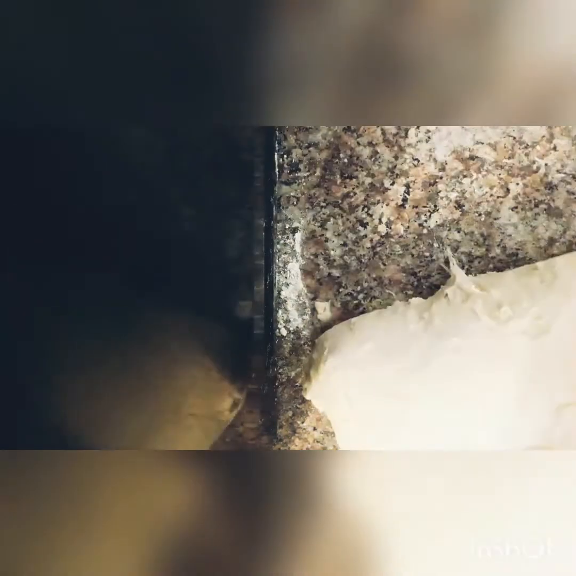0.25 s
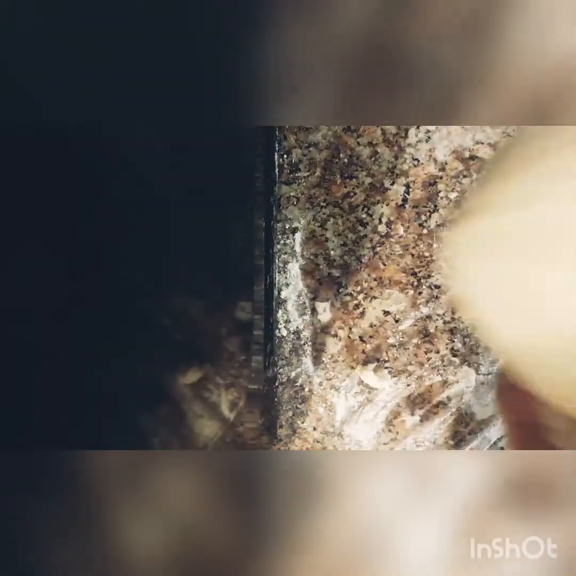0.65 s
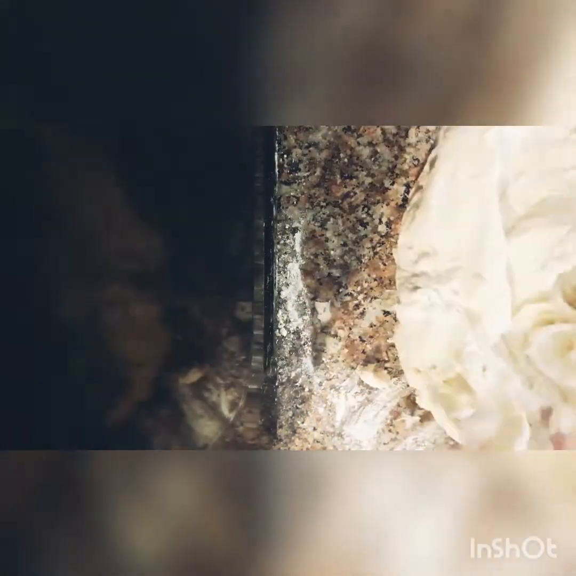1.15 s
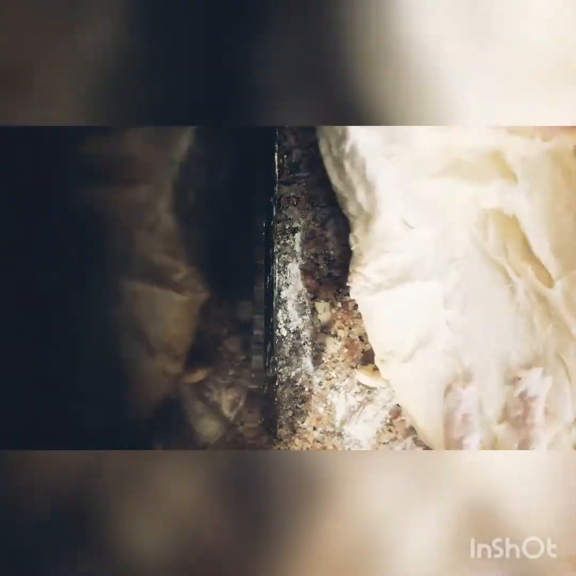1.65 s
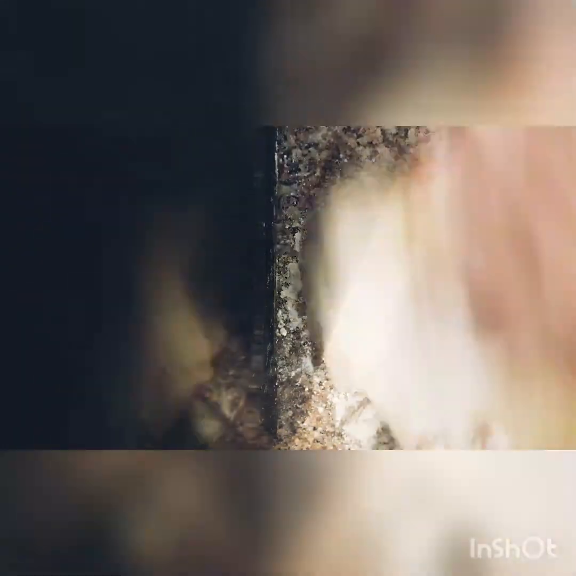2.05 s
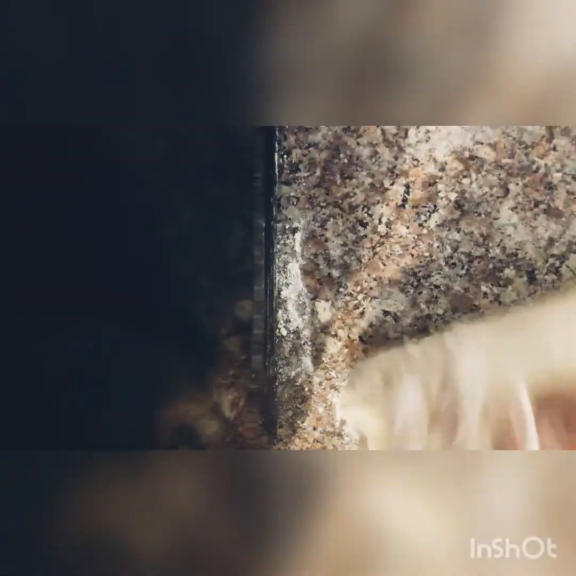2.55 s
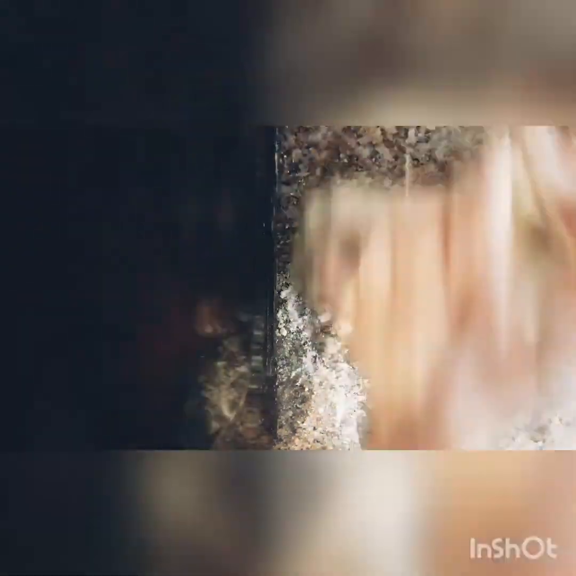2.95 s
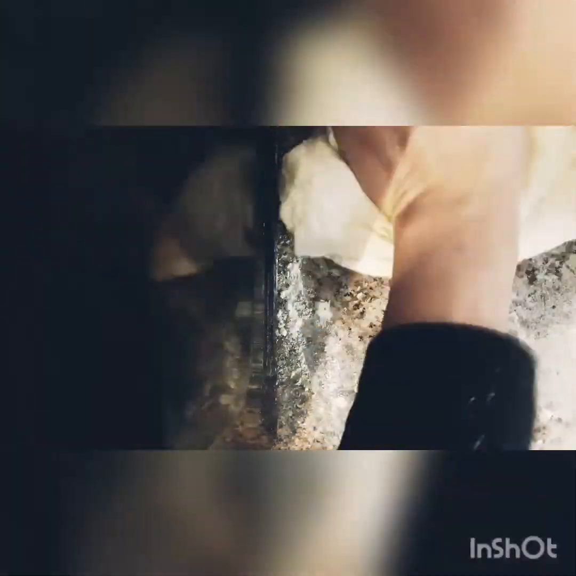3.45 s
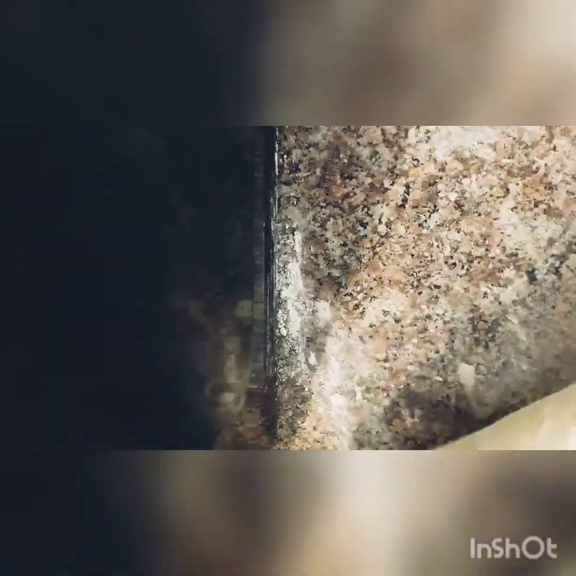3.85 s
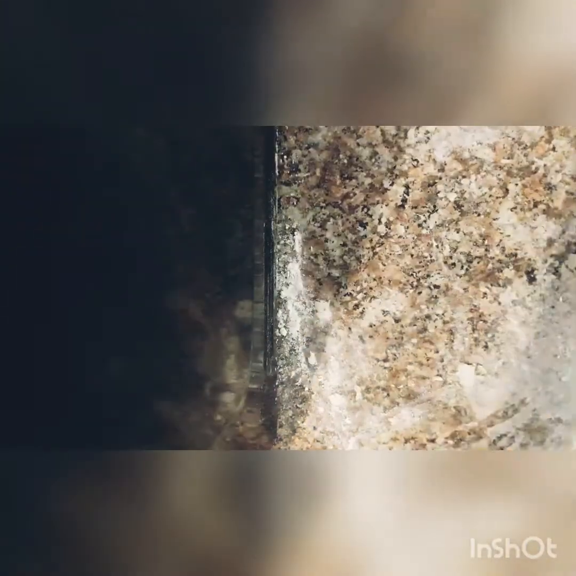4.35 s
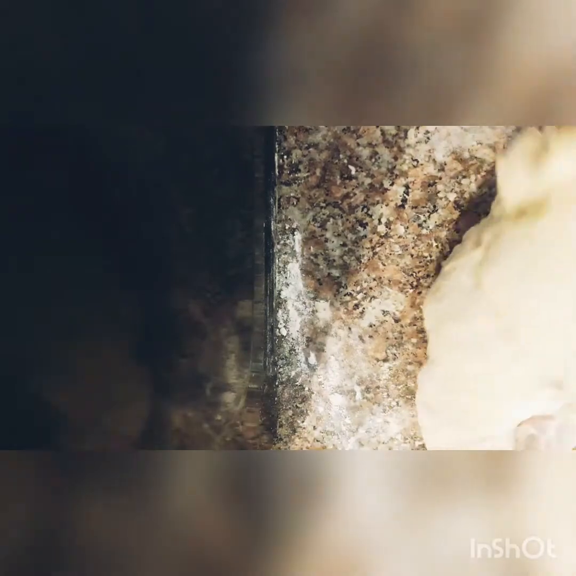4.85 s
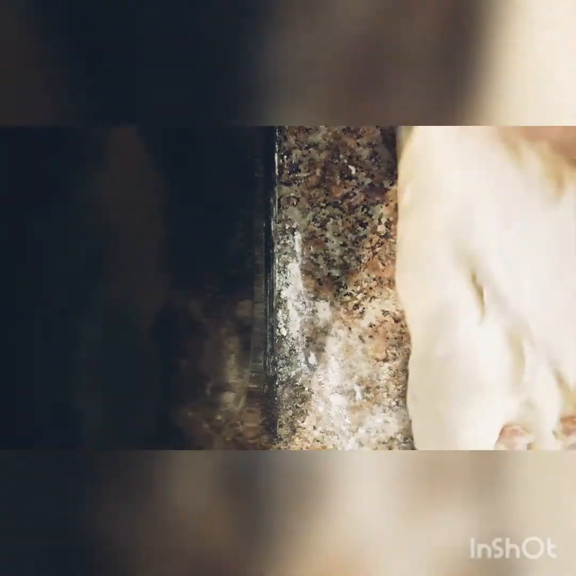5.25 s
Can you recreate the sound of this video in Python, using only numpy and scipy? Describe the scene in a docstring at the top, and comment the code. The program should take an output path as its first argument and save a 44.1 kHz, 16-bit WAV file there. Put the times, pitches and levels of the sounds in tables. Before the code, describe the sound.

Hands knead soft dough on a stone counter, dull echoing thumps and occasional sticky smacks over a steady hiss in a bare kitchen.

```python
"""Dough is kneaded on a stone countertop in a bare, echoing kitchen, over a hiss that runs throughout. At first
the dough only shifts faintly; after about a second the pushes begin. Each push is a soft thump that flutters
between counter and wall cupboards and booms in the room; on some, palm and sticky dough smack. Between and
during pushes the dough slides on floured stone: short hums and swishes of filtered noise. Around 2.8 s the hiss
sinks for a moment; its sizzle grows until 3.9 s, and pushes go on to the end."""
import sys
import numpy as np
from scipy import signal
from scipy.fft import rfft, irfft, next_fast_len
from scipy.io import wavfile
from scipy.ndimage import map_coordinates

SR = 44100
rng = np.random.default_rng(int(sys.argv[2]) if len(sys.argv) > 2 else 0)


def store_wav(level_fs):
    """Save 16-bit WAV to argv[1]."""
    pcm = np.round(np.clip(np.atleast_2d(level_fs), -1, 1) * 32767)
    wavfile.write(sys.argv[1], SR, pcm.T.astype(np.int16))


N = 242578  # length of the scene in samples
T = np.arange(SR) / SR  # clock of a single blow (s)
TIME = np.arange(N) / SR  # clock of the whole scene (s)

# Dough and hand thumping on the counter: (start [s], relative level [dB], extra bass [dB],
# hardness [dB per octave above the knee], room [dB], relative level of the cupboard's shudder [dB])
DOUGH_THUMPS = [(0.9477, -34.5, 5, 1.5, 3, -70), (0.972, -25.5, 4.5, 2.5, -9.5, -53),
                (1.3210, -18, 0.5, -2.5, 2, -55), (1.7500, -35.5, -7, -9, -11, -80),
                (1.802, -19, -1.5, -1, 0.5, -56), (2.1990, -14.5, -3.5, 1, 0.5, -44),
                (2.489, -27, -4, -4, 2, -62), (3.2970, -33, 0, -6, 3.5, -66), (3.7237, -23, 1, 1, 1, -51),
                (4.1313, -30.5, 5.5, -24.5, -2, -67), (4.5640, -25.5, 8.5, -2, -6, -57),
                (4.5761, -14.5, -2, 0.5, -1, -53), (4.6401, -12.5, 0.5, -2.5, -14.5, -68),
                (4.9690, -18.5, -6.5, 3, -1, -70), (5.322, -37, 2, -1, -3.5, -80),
                (5.4395, -34, -8.5, -4, 0, -78)]
# Flutter of sound bouncing between the counter and the wall cupboards above it: (pitch [Hz], relative level
# [dB], time to fade by 60 dB [s])
FLUTTER_MODES = [(291.7, 7.5, 0.09), (502.2, 5.5, 0.14), (798, 7, 0.021), (1080, 5.5, 0.0082),
                 (1670, -12, 0.029)]
# Shudder of the unit under the counter: (pitch [Hz], relative level [dB], time to fade by 60 dB [s])
CUPBOARD_MODES = [(51.5, -5, 0.89), (60, -9, .3), (84, -7, .2), (120, 7, 0.28), (150, -7, .2)]
# Tone colour of the room's blurred answer to a thump: (frequency [Hz], relative level [dB])
THUMP_ROOM_COLOUR = [(25, -38), (60, -38.5), (120, -14.5), (180, -18.5), (225, -9.5), (310, -2), (390, -11),
                     (520, -5.5), (820, -5.5), (1250, -12.5), (1550, -16), (2100, -24), (3500, -33),
                     (8000, -39), (11000, -76)]


def thumps(knee_hz=650, bass_hz=380, push_hz=690, push_db=11, knock_db=-9,
           walls_db=-1, standing_db=-4, diffuse_db=-3.0):
    """Soft blows: a pulse of squeezed air, a quick flutter between counter and wall cupboards, then the boom of
    the room."""
    track = np.zeros(N)
    # the soft dough flattens in about a millisecond: one smooth swing of pressure
    swing = np.pi * (push_hz * T - 1)
    push = (1 - 2 * swing ** 2) * np.exp(-swing ** 2)

    for start_s, db, weight_db, hardness_db, room_db, shudder_db in DOUGH_THUMPS:
        flutter = ring(FLUTTER_MODES, 1, 0) * (1 - np.exp(-T / .001))
        knock = burst(-np.gradient(flutter))
        direct = amp(push_db) * push + amp(knock_db) * knock

        blur = echoes(build_s=0.0093, hold_s=0.0086)
        diffuse = burst(coloured(blur, lambda hz: along(THUMP_ROOM_COLOUR, hz)))
        room = amp(walls_db) * reflected(direct)
        room += amp(standing_db) * standing_waves()
        room += amp(diffuse_db) * diffuse

        def touch(hz):
            """A heavy push has more bass, a hard one more treble."""
            octaves = np.log2(1 + (np.minimum(hz, 4000) / knee_hz) ** 2) / 2
            bass = weight_db / (1 + np.square(hz / bass_hz) ** 2)
            return bass + hardness_db * octaves

        add(track, start_s, amp(db) * coloured(direct + amp(room_db) * room, touch))
        shudder = burst(ring(CUPBOARD_MODES, 0.87, 0) * (1 - np.exp(-T / 0.029)))
        add(track, start_s, amp(shudder_db) * shudder)
    return track


# Smacks of skin and sticky dough: (time of strongest contact [s], relative level [dB], rise [s],
# fall [s], brightness [dB per octave], room [dB])
SKIN_SMACKS = [(0.9747, -25.5, .0025, 0.0031, 4, -8), (1.3450, -39, 0.011, .012, 7, -4.5),
               (1.8540, -14.5, .012, 0.0071, 0, -1.5), (2.226, -40, 0.0089, 0.015, 25, -1),
               (3.7420, -28, 0.0046, 0.0089, -2.5, -4), (4.5660, -29, 0.0015, 0.0022, 5.5, -5),
               (4.5980, -20.5, 0.016, 0.012, 0.5, -3.5), (4.9850, -24.5, 0.0094, .012, 3.5, -3.5),
               (5.4466, -35, 0.0012, 0.0095, -2, -4.5)]
# Tone colour of a smack and of the room's answer to it: (frequency [Hz], relative level [dB])
SMACK_COLOUR = [(60, -25.5), (250, -10), (600, 2.5), (1300, 4), (1800, -1), (2100, 1.5), (2700, -4),
                (3600, -7.5), (5500, -14), (8000, -23.5), (9600, -39), (15000, -43)]


def smacks(pops_per_s=1800, fizz=0.12, direct_db=-8.0, walls_db=-6, diffuse_db=-1.0, standing_db=-13):
    """Tiny air pockets pop as palm, dough and stone close on each other."""
    track = np.zeros(N)
    lead_s = 1 / 10  # room before the peak for the contact to build up

    for peak_s, db, rise_s, fall_s, bright_db, room_db in SKIN_SMACKS:
        closing = np.maximum(lead_s - T, 0) / rise_s
        settling = np.maximum(T - lead_s, 0) / fall_s
        contact = np.exp(-closing ** 2 / 2 - settling) * (1 + settling)
        # scattered single pops over a weak continuous fizz
        is_pop = rng.random(SR) < pops_per_s / SR
        pops = (rng.random(SR) - .5) * (is_pop + fizz) * contact

        def skin(hz):
            """Tone colour of this smack, tilted by its brightness."""
            return along(SMACK_COLOUR, hz) + bright_db * np.log2(np.clip(hz, 300, 7000) / 2000)

        crackle = burst(coloured(pops, skin))
        near = crackle + amp(walls_db + room_db) * reflected(crackle)
        add(track, peak_s - lead_s, amp(db + direct_db) * near)

        # the room fills for as long as the contact lasts
        contact_s = rise_s + fall_s
        blur = echoes(build_s=0.53 * contact_s, hold_s=contact_s + 0.013)
        diffuse = burst(coloured(blur, skin))
        # a smack stirs mainly the high modes of the room
        standing = burst(coloured(np.gradient(standing_waves()), skin))
        room = amp(diffuse_db) * diffuse + amp(standing_db) * standing
        add(track, peak_s - rise_s, amp(db + room_db) * room)
    return track


# Dough sliding and shifting on flour: (time of the peak [s], relative level [dB],
# half length [s], pitch [Hz], half width of the noise band [Hz])
DOUGH_SLIDES = [(0.04, -57.5, 0.026, 250, 70), (0.4, -57, 0.054, 424, 200), (1.648, -48.5, 0.02, 4020, 230),
                (2.24, -39, 0.025, 5900, 1100), (2.737, -47.5, 0.059, 4380, 750),
                (3.007, -60, 0.22, 310, 135), (3.644, -54.5, 0.065, 3970, 600),
                (4.987, -33.5, 0.011, 5600, 800)]


def slides(grain_db=3, grains_per_s=90):
    """Brief soft swishes and squeaks of dough that catches and slips on floured stone."""
    catching = unit(waver(grain_db, grains_per_s))
    swishes = np.zeros(N)
    for peak_s, db, half_s, hz, width_hz in DOUGH_SLIDES:
        stroke = np.exp(-((TIME - peak_s) / half_s) ** 2 / 2)
        swishes += amp(db) * stroke * band(hz, width_hz)
    return catching * swishes


# Tone colour of the broad hiss: (frequency [Hz], relative level [dB])
HISS_COLOUR = [(25, -21), (55, -5), (75, -6.5), (110, 8), (170, -3.5), (450, -5.5), (800, 3.5), (1400, 1.5),
               (2500, 0.5), (4300, -1.5), (5700, 4), (8500, 3.5), (9700, -14.5), (12500, -11),
               (15600, -15.5)]
# Narrow humps in the hiss: (centre [Hz], half width [Hz], relative level [dB])
HISS_HUMPS = [(1838, 190, -53), (3237, 190, -58.5), (6670, 55, -60), (14500, 110, -71)]
LULL_S, LULL_HALF_S = 2.78, 0.47  # middle of the one lull and its half length (s)
HIGH_HISS_LULL_DB = 20  # how deep the high hiss near 8.8 kHz sinks
LULL_DB = 2  # how deep all the rest of the hiss sinks
SIZZLE_DB_PER_S, SIZZLE_FULL_S = 2, 3.9  # the sizzle near 8 kHz grows this fast until this time (s)


def background(hiss_db=-47.0, sizzle_db=-48.5, humps_db=1, high_hiss_db=-58,
               waver_db=1, waver_rate=12, drift_db=0.4, drift_rate=3):
    """Filtered noise: drifting hiss, wavering humps, a growing sizzle, a high hiss band that sinks most."""
    lull = np.exp(-((TIME - LULL_S) / LULL_HALF_S) ** 2 / 2)

    hiss = unit(coloured(rng.standard_normal(N), lambda hz: along(HISS_COLOUR, hz)))
    broad = amp(hiss_db) * waver(drift_db, drift_rate) * hiss

    humps = np.zeros(N)
    for hz, width_hz, db in HISS_HUMPS:
        humps += amp(humps_db + db) * band(hz, width_hz) * waver(waver_db, waver_rate)

    still_to_grow_db = SIZZLE_DB_PER_S * np.maximum(SIZZLE_FULL_S - TIME, 0)
    sizzle = amp(sizzle_db - still_to_grow_db) * band(7840, 570)
    high_hiss = amp(high_hiss_db - HIGH_HISS_LULL_DB * lull) * band(8820, 570)
    return amp(-LULL_DB * lull) * (broad + humps + sizzle) + high_hiss


# First reflections from walls and cupboards: (delay [s], level [dB])
WALL_REFLECTIONS = [(.0110, -8.5), (0.021, -9), (0.03, -6), (.0410, -3.5), (.0730, -8.5)]


def reflected(x):
    """Copies of a sound thrown back by the nearest walls and cupboards."""
    out = np.zeros(len(x))
    for delay_s, db in WALL_REFLECTIONS:
        add(out, delay_s, amp(db) * x)
    return out


# Standing waves of the kitchen: (pitch [Hz], relative level [dB])
ROOM_MODES = [(104, -14.5), (132, -19), (215, -5), (265, -9.5), (288, -2.5), (304, -4.5), (327, 0.5),
              (408, -8.5), (444, -15), (470, -3.5), (538, -2), (567, -10), (594, -8), (618, -19),
              (645, -13.5), (735, -4), (782, 1), (799, -5), (837, -1), (868, -4), (910, -13), (1065, -6),
              (1191, -11), (1340, -10.5), (1517, -14.5), (1637, -15), (2055, -17), (2225, -25)]


def standing_waves(build_s=0.0093, life=0.99):
    """The room's strongest modes swell after a blow and die almost as slowly as the room."""
    modes = [(hz, db, life * along(ROOM_FADE, hz)) for hz, db in ROOM_MODES]
    ringing = ring(modes, 1.5, .35)
    return burst(ringing * (1 - np.exp(-T / build_s)))


# How long the kitchen echoes: (frequency [Hz], time to fade by 60 dB [s])
ROOM_FADE = [(60, 1), (160, 0.8), (420, 0.7), (1100, 0.62), (3000, 0.66), (8000, 0.59)]


def echoes(build_s, hold_s):
    """A blurred room answer: it builds, holds while the first walls reply, then dies band by band."""
    hz, t, bands = signal.stft(rng.standard_normal(SR), SR, nperseg=256)
    fade_db = -60 * np.maximum(t - hold_s, 0) / along(ROOM_FADE, hz)[:, None]
    noise = signal.istft(bands * amp(fade_db), SR, nperseg=256)[1][:SR]
    return noise * (1 - np.exp(-T / build_s))


def ring(modes, scatter_db, scatter_turns):
    """Fading sine tones, with levels (dB) and phases (turns) that vary a little at each blow."""
    hz, db, t60 = np.transpose(modes)[:, :, None]
    level, phase = rng.standard_normal((2, len(modes), 1))
    fade = np.exp(-np.log(1000) * T / t60)  # 60 dB down is a factor of 1000
    tones = np.sin(2 * np.pi * (hz * T + scatter_turns * phase))
    return np.sum(amp(db + scatter_db * level) * fade * tones, axis=0)


def waver(depth_db, rate):
    """A smooth random gain over the scene, with this many fresh random values per second."""
    return amp(depth_db * map_coordinates(rng.standard_normal(SR), [TIME * rate]))


def band(centre_hz, width_hz):
    """Noise of rms 1 in one smooth hump, 6 dB down at width_hz from its centre."""
    def hump(hz):
        return -20 * np.log10(1 + ((hz - centre_hz) / width_hz) ** 2)
    return unit(coloured(rng.standard_normal(N), hump))


def coloured(x, gain_db):
    """Filter x by a gain in dB given for each frequency, with no sound before its cause."""
    m = 2 * next_fast_len(len(x))
    gain = np.maximum(amp(gain_db(np.fft.rfftfreq(m, 1 / SR))), 1e-6)
    # folding the cepstrum gives the filter its minimum phase
    cepstrum = irfft(np.log(gain), m)
    cepstrum[1:m // 2] *= 2
    cepstrum[m // 2 + 1:] = 0
    return irfft(rfft(x, m) * np.exp(rfft(cepstrum)), m)[:len(x)]


def along(points, hz):
    """Read a curve of (frequency, value) points, joined by straight lines on a log axis."""
    f, v = np.transpose(points)
    return np.interp(np.log(hz + 1), np.log(f), v)


def amp(db):
    """Decibels to gain."""
    return 10 ** (np.asarray(db) / 20)


def unit(x):
    """Scale to rms 1."""
    return x / np.sqrt(np.mean(x ** 2) + 1e-20)


def burst(x):
    """Scale a blow to the energy of a tenth of a second at rms 1."""
    return x / np.sqrt(np.sum(x ** 2) * 10 / SR + 1e-20)


def add(track, s, sound):
    """Mix a sound into the track at time s."""
    part = track[round(s * SR):][:len(sound)]
    part += sound[:len(part)]


def scene():
    """Everything at one microphone above the counter."""
    return (thumps() + smacks() + slides() + background())[None]


TOP_HZ = 15750  # nothing is heard above this frequency


def record(dry):
    """Round off the highest peaks smoothly, then drop everything above the band limit."""
    rounded = dry / (1 + np.abs(dry / .92) ** 6) ** (1 / 6)
    m = next_fast_len(N + SR // 2)
    passed = np.fft.rfftfreq(m, 1 / SR) < TOP_HZ
    return irfft(rfft(rounded, m) * passed, m)[:, :N]


dry = scene()
out = record(dry)
store_wav(out)
```